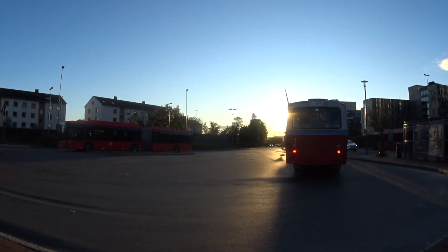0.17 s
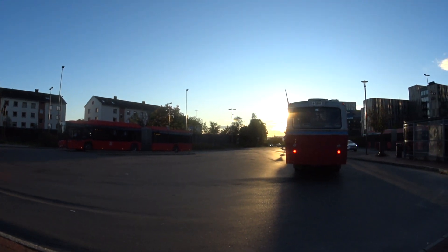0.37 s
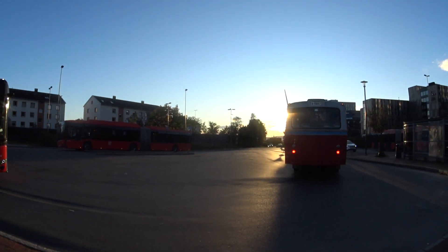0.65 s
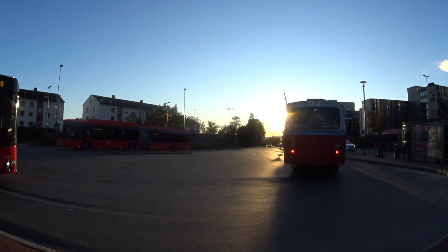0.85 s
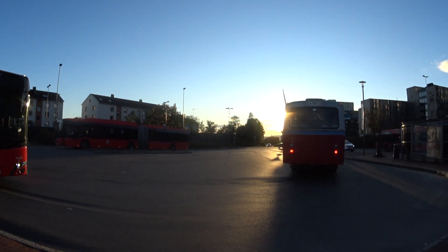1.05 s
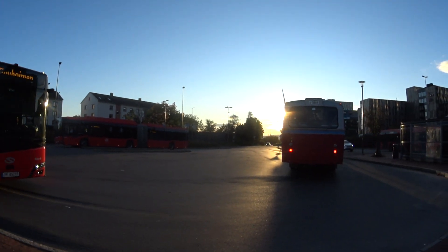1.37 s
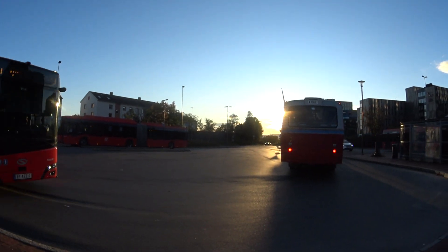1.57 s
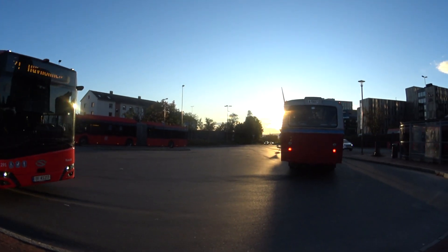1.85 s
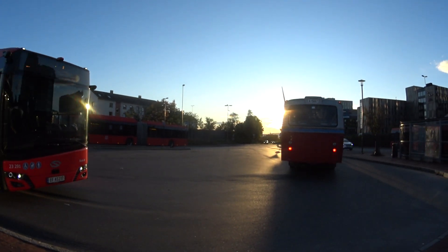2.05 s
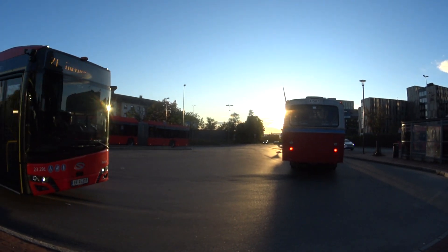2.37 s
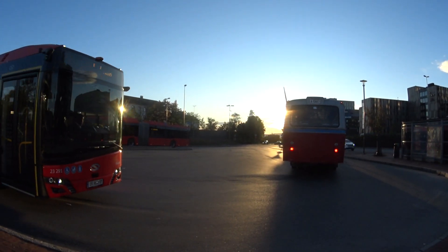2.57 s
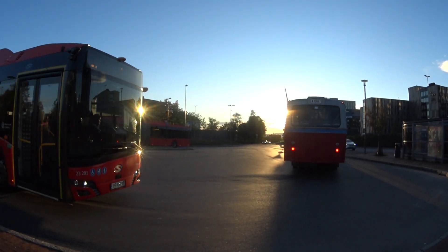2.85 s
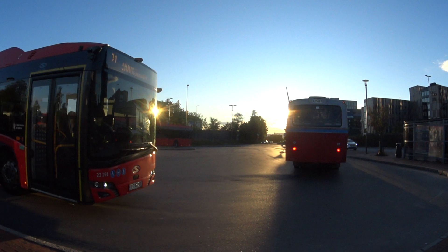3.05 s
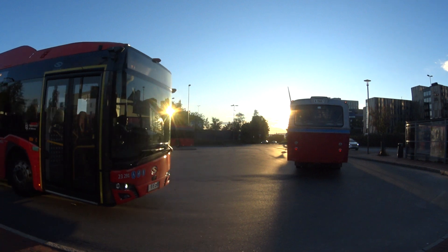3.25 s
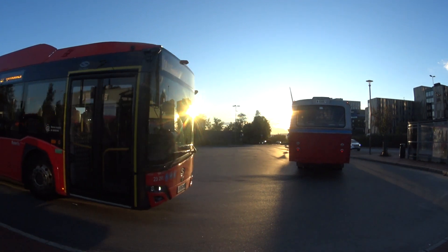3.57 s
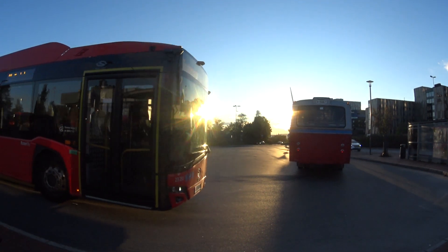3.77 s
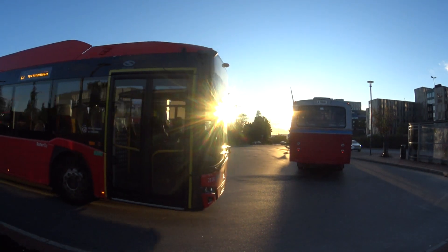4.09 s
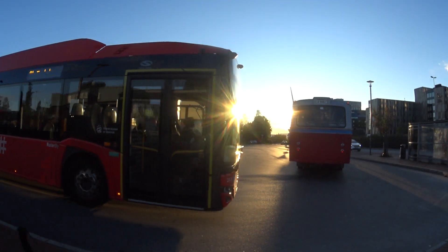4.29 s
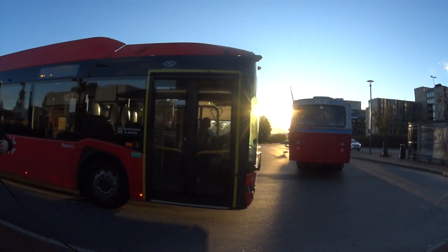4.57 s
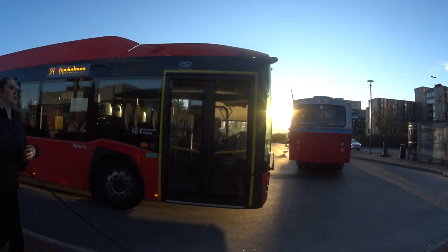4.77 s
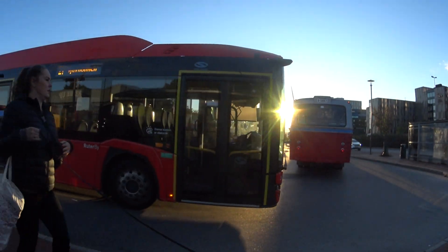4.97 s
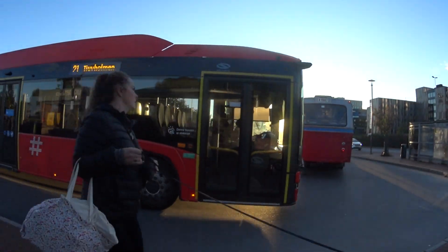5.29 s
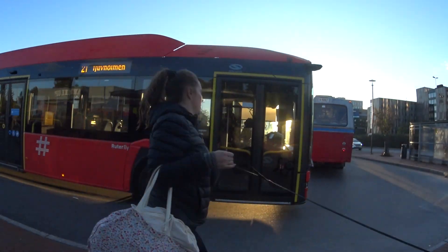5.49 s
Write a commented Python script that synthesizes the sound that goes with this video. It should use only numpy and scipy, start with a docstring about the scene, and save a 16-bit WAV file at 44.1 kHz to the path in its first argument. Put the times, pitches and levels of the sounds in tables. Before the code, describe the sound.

A loud hiss of compressed air bursts from a nearby city bus, followed by a chirping valve puff and a single short horn toot, a little to the left. Both echo briefly around the open terminal. Faint, high brake squeals come and go as the bus rolls slowly on, with one more short hiss midway. Steady traffic rumble, a light engine whine and fizzing fans continue underneath.

```python
"""A city bus rolls slowly into an open terminal, over the steady rumble of traffic and engines.
Half a second in, it dumps compressed air with a loud hiss, and a brake valve puffs and whistles.
Next, two buzzing metal discs (diaphragms) give one toot of its two-tone electric horn.
The brakes sing thinly as the bus creeps on; near three seconds the valve puffs again, and the body
rattles faintly. Other buses echo the horn, and house fronts throw back both horn and air."""
import sys
import numpy as np
from scipy import signal
from scipy.fft import rfft, irfft, next_fast_len
from scipy.io import wavfile
from scipy.ndimage import uniform_filter1d, map_coordinates

SR = 44100
rng = np.random.default_rng(int(sys.argv[2]) if len(sys.argv) > 2 else 0)


def generate_wav(sig):
    """Save sig (samples, or channels by samples) to the path in sys.argv[1] as 16-bit PCM at SR."""
    pcm = np.round(np.clip(np.atleast_2d(sig).T, -1, 1) * 32767).astype(np.int16)
    wavfile.write(sys.argv[1], SR, pcm)


N = 248349
TIME = np.arange(N) / SR

# Tone colours: how strong the lows and highs are. Each row: frequency in Hz, relative level in dB.
DUMP_COLOUR = [(88, -65), (150, -44), (227, -14), (262, -21), (302, -12.5), (349, -10), (537, -3.5),
               (609, -12), (679, -1), (1230, -6), (1340, -1), (1730, -5.5), (4320, -5), (7280, -9.5),
               (11000, -18.5), (14300, -62), (22000, -120)]
VALVE_COLOUR = [(410, -24), (700, -13), (892, -45), (923, -26), (1110, -4.5), (1250, -10), (1350, -3.5),
                (1760, -10), (1890, -6.5), (2990, 0.5), (4740, -7.5), (7700, -8), (11000, -19.5),
                (14300, -63), (22000, -120)]
RASP_COLOUR = [(300, -23), (700, -15), (1500, -5), (3200, 9), (5000, 1), (8000, -9), (11000, -34)]
ECHO_COLOUR = [(400, -5), (800, -8), (1000, 5), (1500, -3), (3000, -6), (9000, 0)]
TRAFFIC_COLOUR = [(15, -64), (25, -26), (112, -17), (155, -15.5), (288, -4), (374, -12), (430, -5),
                  (494, -7.5), (629, -3), (724, -4.5), (884, -1), (1080, -2.5), (1190, -4), (1290, -5.5),
                  (3000, -18), (3900, -36), (6600, -120)]
FAN_COLOUR = [(880, -18), (1500, 5), (2370, -2), (2560, -2), (2780, -5), (3000, -3), (3950, -16),
              (4250, -11.5), (5460, -13.5), (5790, -14.5), (6290, -9.5), (7130, -17.5), (11000, -34.5),
              (14300, -70), (22000, -120)]
# Hollow spaces that ring. Each row: frequency in Hz, width in Hz, boost in dB.
UNDER_BUS_RESONANCES = [(228, 18, 7), (300, 18, 5.5), (976, 59, 6), (1359, 69, 7)]
PORT_RESONANCES = [(3080, 450, 1.5)]
# The pure tones (partials) in each horn. Each row: multiple of the pitch, relative level in dB.
HIGH_HORN_PARTIALS = [(1, -28.5), (2, -25), (3, -22), (4, -23), (5, -25), (6, -28), (7, -35.5), (8, -42),
                      (9, -52), (14, -52), (21, -67)]
LOW_HORN_PARTIALS = [(1, -35), (2, -31.5), (3, -28), (4, -32), (5, -39), (6, -26.5), (7, -25.5), (8, -37),
                     (9, -39), (10, -41), (12, -49), (17, -46.5), (26, -70)]
# Horn echoes from buses and shelters. Each row: delay in seconds, relative level in dB.
HORN_ECHOES = [(.054, -13), (.0945, -17)]
# Brake valve puffs. Each row: start, length and fade time in seconds, relative level in dB.
VALVE_PUFFS = [(0.987, .11, .078, -20.5), (3.13, 0.098, 0.15, -22)]
# Brake squeals. Each row: start and length in seconds, pitch in Hz, relative peak level in dB.
SQUEALS = [(.45, 0.13, 8890, -59), (1.19, .13, 9900, -56), (1.48, .2, 9990, -51), (1.492, .9, 8935, -57.5),
           (1.557, .32, 4010, -49), (1.66, .33, 10160, -54.5), (1.762, .2, 4015, -52),
           (1.928, .27, 10040, -49), (1.96, .32, 4030, -50.5), (2.133, .16, 9940, -57),
           (2.17, .16, 5308, -47), (2.25, .1, 3855, -50), (3.68, 0.33, 8884, -54.5),
           (3.9, .42, 8895, -55.5), (4.25, .7, 2605, -53), (4.71, .12, 5285, -48.5),
           (4.73, 0.21, 9150, -62), (4.8, 0.31, 5280, -48), (4.8, 0.48, 6960, -55), (5.0, 0.23, 5277, -58),
           (5.05, .12, 2900, -49.5), (5.17, .58, 5275, -42), (5.38, .26, 9160, -63.5)]
# Body rattles. Each row: start in seconds, relative level in dB, pitch in Hz, seconds to fade 60 dB.
RATTLES = [(2.89, -54, 7500, .012), (5.018, -51, 4800, .012), (5.02, -59.5, 10500, .03),
           (5.172, -50, 3600, 0.017)]
# Tyre and engine roar. Each row: time in seconds, relative level in dB.
ROAR_LEVEL = [(0, -36.5), (.5, -35.5), (2.6, -38), (3.6, -37.5), (4.25, -36), (4.8, -38), (5.63, -38)]
# Engine whine, loudest until the driver lifts off.
# Each row: time in seconds, pitch in Hz, relative level in dB.
ENGINE_WHINE = [(0, 1244, -40), (.48, 1236, -39.5), (.6, 1237, -44), (3.4, 1254, -52), (4.3, 1220, -44.5),
                (5.63, 1231, -52)]
# How long the house fronts echo. Each row: frequency in Hz, seconds to fade 60 dB.
HOUSE_DECAY = [(200, 0.7), (1000, 0.55), (3000, 0.56), (10000, 0.55)]
# How alike left and right sound. Each row: frequency in Hz, likeness (1 means the same).
DUMP_LIKENESS = [(60, 0.63), (170, 0.92), (480, 0.76), (1370, 0.66), (3900, 0.86), (11100, 1)]
VALVE_LIKENESS = [(60, 0.81), (340, 0.57), (1940, 0.71), (11100, 1)]
STREET_LIKENESS = [(60, 0.93), (140, 0.96), (340, 0.92), (810, 0.59), (1940, 0.73), (4640, 0.83),
                   (11100, 0.78)]
HOUSE_LIKENESS = [(200, 0.73), (1000, 0.61), (3000, 0.35), (10000, 0.34)]
# The left side's head start. Each row: frequency in Hz, phase lead in radians when leftward is 1.
LEFT_LEAD = [(60, 0.23), (200, 0.46), (450, 0.55), (1900, 0.65), (3300, 0.36), (5500, 0.28), (11000, 0.8)]

HORN_ON_S, HORN_OFF_S = 1.283, 1.474  # the button is pressed and let go


def air_dump(drain_db_per_s=22):
    """A wide jet of air hisses, then roars under the bus; both sink as the tank empties."""
    jet = rushing_noise(DUMP_COLOUR, DUMP_LIKENESS, patchy_db=.5)
    jet = resonate(near_echoes(jet, share=.5, within_s=.025), UNDER_BUS_RESONANCES)
    lows = filtered(jet, lambda hz: 1 / (1 + (hz / 1700) ** 4))
    hiss_s, roar_s = .56, .595  # start times
    hiss = (jet - lows) * envelope(hiss_s, attack_s=.06, length_s=.42, release_s=.06)
    hiss *= amp(-13.6 - drain_db_per_s * (TIME - hiss_s))
    roar = lows * envelope(roar_s, attack_s=.025, length_s=.435, release_s=.07)
    roar *= amp(-14.3 - drain_db_per_s * (TIME - roar_s))
    return placed(hiss + roar, pan_db=-1, leftward=.76)


def horn(pitches_hz=(516.1, 416.2), jitter=.0026, coupling=.22, rasp_db=-22, gain_db=4):
    """Two horns a major third apart share one supply wire, so each makes the other's level shake."""
    drive = envelope(HORN_ON_S, attack_s=.014, length_s=HORN_OFF_S - HORN_ON_S, release_s=.052) ** 2
    sag = .045 * np.exp(-((TIME - HORN_ON_S) / .024) ** 2)  # the pitch starts a little low
    sag += 1.5 * np.maximum(TIME - HORN_OFF_S, 0)  # and runs down once the button is let go
    high_phase, low_phase = [phase_of(hz * (1 - sag + jitter * wobble(170))) for hz in pitches_hz]
    high = diaphragm(high_phase, drive, HIGH_HORN_PARTIALS, flare_db=11, drift_db=1.6)
    low = diaphragm(low_phase, drive, LOW_HORN_PARTIALS, flare_db=10, drift_db=2.2)
    toot = high * (1 + coupling * np.cos(low_phase)) + low * (1 + coupling * np.cos(high_phase))
    strikes = (1 + np.cos(high_phase)) ** 2 + (1 + np.cos(low_phase)) ** 2  # a puff of rasp each swing
    rasp = filtered(rng.standard_normal(N), lambda hz: amp(look_up(RASP_COLOUR, hz))) * strikes * drive
    toot += amp(rasp_db) * np.std(toot) * unit(rasp)
    toot = filtered(toot, lambda hz: 1 - 1 / (1 + (hz / 350) ** 14))  # small trumpets give no bass
    echoes = sum(amp(db) * np.roll(toot, int(delay_s * SR)) for delay_s, db in HORN_ECHOES)
    echoes = filtered(echoes, lambda hz: amp(look_up(ECHO_COLOUR, hz)))
    nearby = placed(toot, pan_db=4.5, leftward=1) + placed(echoes, pan_db=1, leftward=.43)
    return amp(gain_db) * (nearby + amp(-13) * house_echo(toot, delay_s=.012))


def diaphragm(phase, drive, partials, flare_db, drift_db, stopping_s=.012, dull_db=.23):
    """One horn's buzzing disc; as it runs down, partial 2 meets the trumpet's resonance and flares."""
    sounding = drive > 1e-4
    multiples, levels = np.transpose(partials)
    stopping = np.clip((TIME[sounding] - HORN_OFF_S) / stopping_s, 0, 1)
    buzz = np.zeros(N)
    for k in range(1, int(multiples[-1]) + 1):
        drift = drift_db * signal.resample(rng.standard_normal(18), sounding.sum())  # each wavers alone
        stop_db = flare_db if k == 2 else -dull_db * k
        db = np.interp(k, multiples, levels) + drift + stopping * stop_db
        buzz[sounding] += amp(db) * np.sqrt(2) * np.sin(k * phase[sounding] + rng.uniform(0, 2 * np.pi))
    return buzz * drive


def brake_valve(attack_s=.029, treble_db=3.5, dulling=.79):
    """Short puffs of air leave through a ringing port and turn dull as the flow dies."""
    puffs = 0
    for start_s, length_s, release_s, db in VALVE_PUFFS:
        flow = envelope(start_s, attack_s, length_s, release_s)
        jet = rushing_noise(VALVE_COLOUR, VALVE_LIKENESS, patchy_db=-.26)
        jet = resonate(near_echoes(jet, share=.57, within_s=.015), PORT_RESONANCES)
        lows = filtered(jet, lambda hz: 1 / (1 + (hz / 5500) ** 4))
        highs = amp(treble_db) * flow ** dulling * (jet - lows)
        puffs += (lows + highs) * amp(db) * flow
    return placed(puffs, pan_db=-.5, leftward=.66)


def port_whistle(start_s=1.056, start_hz=3104, fall_hz_per_s=9000):
    """The valve's port chirps once at full flow; the pitch sinks as the pressure drops."""
    hz = start_hz - fall_hz_per_s * np.maximum(TIME - start_s, 0)
    level = amp(-19.5) * envelope(start_s, attack_s=.013, length_s=.023, release_s=.014)
    chirp = level * tone(hz, waver=.009, flutter_db=1, stutter_db=1)
    return placed(chirp, pan_db=-.5, leftward=.9)


def brake_knock(at_s=1.045, hz=129, db=-43, width_s=.011):
    """The brake gear knocks softly as the valve first opens."""
    return amp(db) * np.exp(-((TIME - at_s) / width_s) ** 2) * np.sin(2 * np.pi * hz * TIME)


def brake_squeal(rise_share=.6, swell_db=15, sink_per_s=.004):
    """The pads make the brake discs ring in single notes that swell, flutter, sink a little and fade."""
    squeals = np.zeros(N)
    for start_s, length_s, hz, db in SQUEALS:
        rise_s = length_s * rise_share
        since_peak = TIME - start_s - rise_s
        from_peak = since_peak / np.where(since_peak < 0, rise_s, length_s - rise_s)
        note = tone(hz * (1 - sink_per_s * since_peak), waver=.00082, flutter_db=1.7, stutter_db=3)
        squeals += amp(db - swell_db * from_peak ** 2) * note
    return placed(squeals, pan_db=6, leftward=.64)


def body_rattles(gain_db=9):
    """The bus body ticks: each tick is a burst of narrow noise that dies at once."""
    ticks = np.zeros(N)
    for start_s, db, pitch_hz, fade_s in RATTLES:
        ring = unit(filtered(rng.standard_normal(N), lambda hz: 1 / (1 + ((hz - pitch_hz) / 400) ** 2)))
        ticks += amp(db + gain_db - 60 * np.abs(TIME - start_s) / fade_s) * (TIME >= start_s) * ring
    return ticks


def traffic(split_hz=350):
    """Idling engines rumble in the lows while tyres and engines roar above them."""
    roar_db, = curves(ROAR_LEVEL)
    noise = rushing_noise(TRAFFIC_COLOUR, STREET_LIKENESS, patchy_db=.72)
    rumble = unit(filtered(noise, lambda hz: (hz < split_hz) / np.sqrt(1 + (32 / (hz + 1)) ** 4)))
    roar = unit(filtered(noise, lambda hz: (hz >= split_hz) / np.sqrt(1 + (hz / 2000) ** 16)))
    street = amp(-50.5 + .62 * wobble(3.48)) * rumble + amp(roar_db + .28 * wobble(17)) * roar
    return placed(street, pan_db=-1, leftward=.91)


def fans_and_engine(grow_db_per_s=.25):
    """On the left, the bus's engine whines and its fans fizz, the fans growing as it draws up."""
    fizz = rushing_noise(FAN_COLOUR, STREET_LIKENESS, patchy_db=1.5)
    fizz = unit(filtered(fizz, lambda hz: 1 - 1 / (1 + (hz / 1900) ** 12)))
    fans = amp(-46.5 + grow_db_per_s * TIME) * near_echoes(fizz, share=.39, within_s=.016)
    whine_hz, whine_db = curves(ENGINE_WHINE)
    whine = amp(whine_db) * tone(whine_hz, waver=.0032, flutter_db=.5, stutter_db=.4)
    return placed(fans + whine, pan_db=2.5, leftward=.93)


def near_echoes(sound, share, within_s, count=14):
    """Quick, weak echoes off the road and bus sides lift some frequencies and cancel others."""
    delays, gains = rng.uniform(.001, within_s, count), rng.standard_normal(count)
    gains *= share / np.linalg.norm(gains)
    echoes = sum(gain * np.roll(sound, int(delay * SR), axis=-1) for delay, gain in zip(delays, gains))
    return (sound + echoes) / np.hypot(1, share)


def house_echo(sound, delay_s):
    """The house fronts answer late; the highs are weaker and die first."""
    hz, t, spectrum = signal.stft(rng.standard_normal((2, SR)), SR, nperseg=256)
    fade = amp(-60 * t / look_up(HOUSE_DECAY, hz)[:, None])
    tail = signal.istft(spectrum * fade, SR, nperseg=256)[1]
    tail = stereo(tail, colour=[(1000, 5), (3000, -1), (10000, -3.5)], likeness=HOUSE_LIKENESS)[:, :SR]
    late = np.pad(sound, (int(delay_s * SR), 0))[None]
    return signal.fftconvolve(late, tail / np.linalg.norm(tail[0]), axes=1)[:, :N]


def rushing_noise(colour, likeness, patchy_db):
    """Swirling air: stereo noise with random louder and softer patches."""
    spectrum = signal.stft(rng.standard_normal((2, N)), nperseg=512)[2]
    patches = uniform_filter1d(rng.standard_normal(spectrum.shape[1:]), size=6, axis=0)
    patches = unit(uniform_filter1d(patches, size=14, axis=1))
    pair = signal.istft(spectrum * amp(patchy_db * patches), nperseg=512)[1][:, :N]
    return stereo(pair, colour, likeness)


def tone(hz, waver, flutter_db, stutter_db):
    """A thin note whose pitch wavers and whose level flutters slowly and stutters quickly."""
    phase = phase_of(hz * (1 + waver * wobble(60)))
    db = flutter_db * np.minimum(wobble(18), 1) + stutter_db * wobble(70)
    return amp(db) * np.sqrt(2) * np.sin(phase)


def resonate(sound, resonances):
    """Boost the frequencies where a hollow space rings, then set the strength to 1."""
    def boost_db(hz):
        return sum(db / (1 + (2 * (hz - centre) / width) ** 2) for centre, width, db in resonances)
    return unit(filtered(sound, lambda hz: amp(boost_db(hz))))


def stereo(pair, colour, likeness):
    """Blend two unrelated noises into a left and right with the given colour and likeness."""
    def weights(hz):
        angle = np.arccos(np.clip(look_up(likeness, hz), -1, 1)) / 2
        return amp(look_up(colour, hz)) * [np.cos(angle), np.sin(angle)]
    mid, side = filtered(pair, weights)
    return np.array([mid + side, mid - side]) / np.std(mid)


def placed(sound, pan_db, leftward):
    """Make the left side louder by pan_db and earlier by an amount set by leftward."""
    sides = np.array([[.5], [-.5]])
    gains = amp(pan_db * sides)
    return filtered(sound, lambda hz: gains * np.exp(1j * sides * leftward * look_up(LEFT_LEAD, hz)))


def envelope(start_s, attack_s, length_s, release_s):
    """A gain that ramps up, holds until length_s after the start, then dies away."""
    age = TIME - start_s
    return np.clip(age / attack_s, 0, 1) * np.exp(-(np.maximum(age - length_s, 0) / release_s) ** 1.5)


def filtered(sound, response):
    """Multiply each frequency in the sound by response(hz)."""
    size = next_fast_len(N + SR // 2)
    return irfft(rfft(sound, size) * response(np.fft.rfftfreq(size, 1 / SR)), size)[..., :N]


def wobble(per_s):
    """A smooth curve through per_s random values each second."""
    return map_coordinates(rng.standard_normal(int(N * per_s / SR) + 4), [TIME * per_s])


def phase_of(hz):
    """Add up a changing pitch into the wave's angle in radians."""
    return 2 * np.pi * np.cumsum(hz) / SR


def curves(rows):
    """Turn each column after the time into one value per sample."""
    times, *columns = np.transpose(rows)
    return [np.interp(TIME, times, column) for column in columns]


def look_up(rows, hz):
    """Read between a table's rows on a log frequency scale."""
    frequencies, values = np.transpose(rows)
    return np.interp(np.log(hz + 1), np.log(frequencies + 1), values)


def unit(sound):
    """Scale to an average strength (rms) of 1."""
    return sound / np.sqrt(np.mean(sound ** 2) + 1e-20)


def amp(db):
    """Turn decibels into a gain."""
    return 10 ** (np.asarray(db) / 20)


def scene():
    """Add up everything that sounds at the terminal."""
    air = air_dump() + brake_valve() + port_whistle()
    background = traffic() + fans_and_engine()
    air_echo = amp(-16) * house_echo(air.mean(axis=0), delay_s=.025)
    return air + air_echo + horn() + brake_knock() + brake_squeal() + body_rattles() + background


def record(dry, ceiling_db=-13.5, detect_s=.04, recover_db_per_s=3.6, top_hz=11200):
    """A gain control turns loud moments down and recovers slowly; nothing above top_hz is kept."""
    power = np.abs(uniform_filter1d(np.mean(dry ** 2, axis=0), size=int(detect_s * SR)))
    over_db = np.maximum(10 * np.log10(power + 1e-12) - ceiling_db, 0)
    recovery_db = recover_db_per_s * TIME
    cut_db = np.maximum.accumulate(over_db + recovery_db) - recovery_db
    return filtered(dry * amp(-cut_db), lambda hz: hz < top_hz)


dry = scene()
out = record(dry)
generate_wav(out)
```